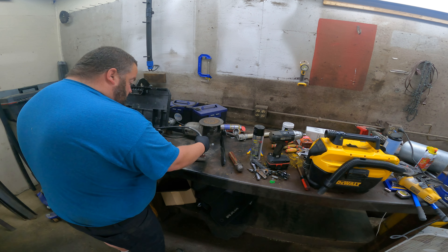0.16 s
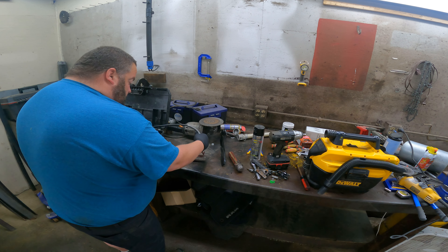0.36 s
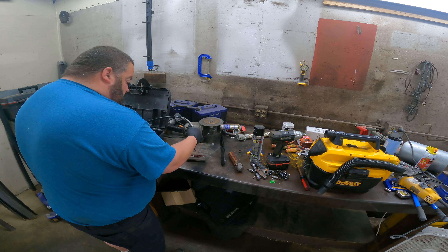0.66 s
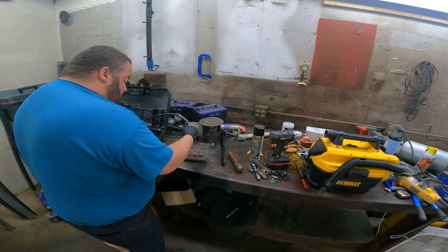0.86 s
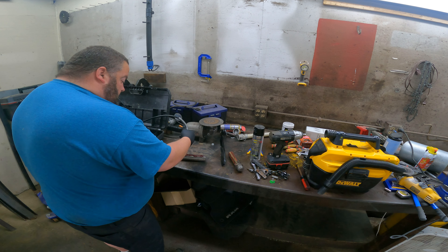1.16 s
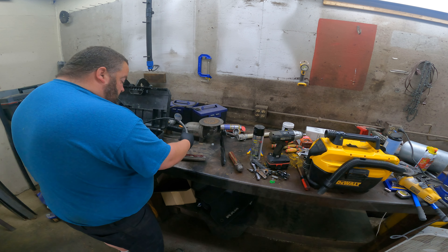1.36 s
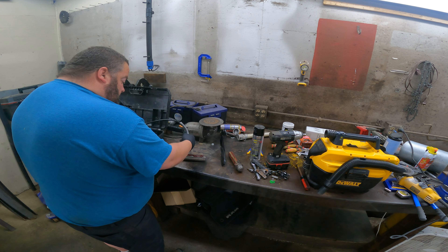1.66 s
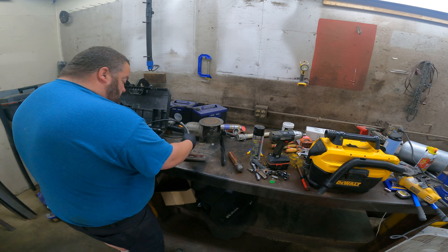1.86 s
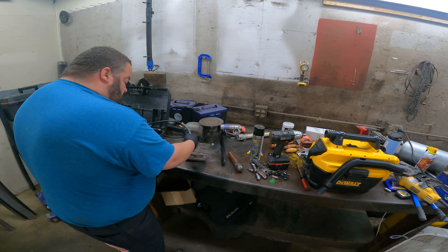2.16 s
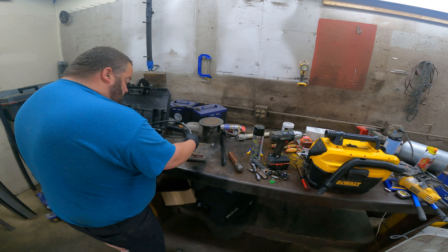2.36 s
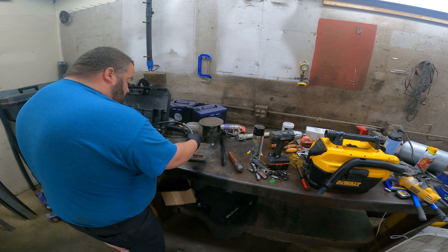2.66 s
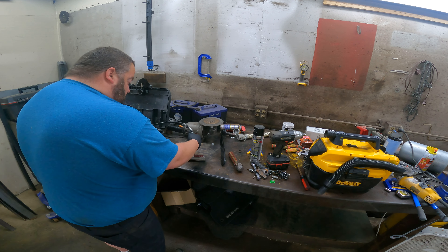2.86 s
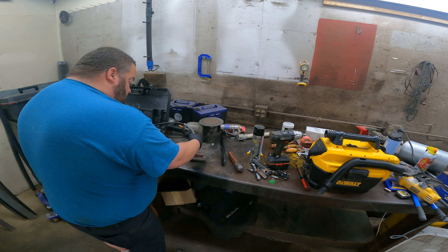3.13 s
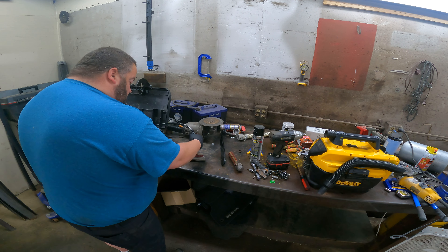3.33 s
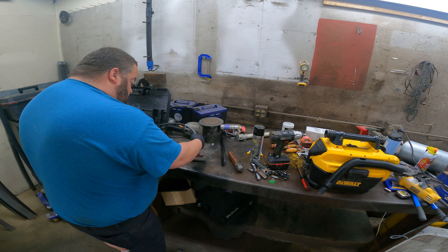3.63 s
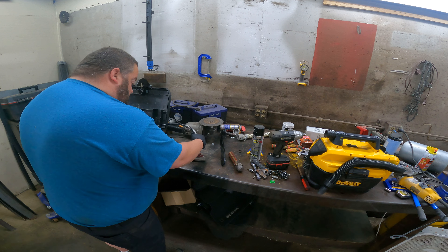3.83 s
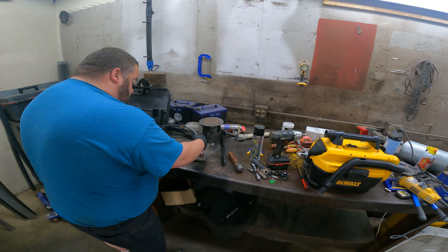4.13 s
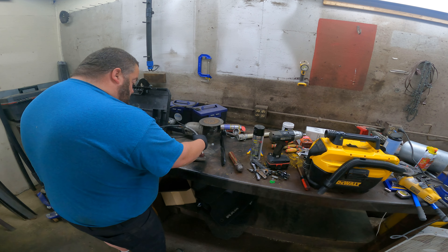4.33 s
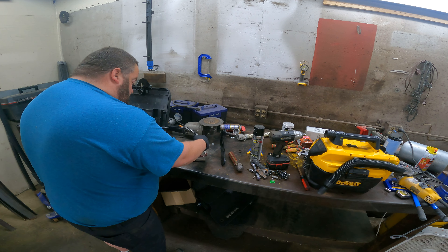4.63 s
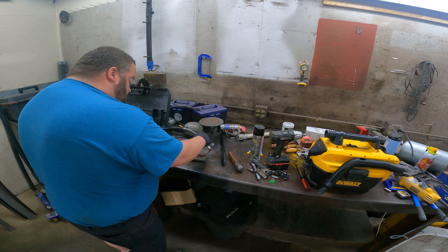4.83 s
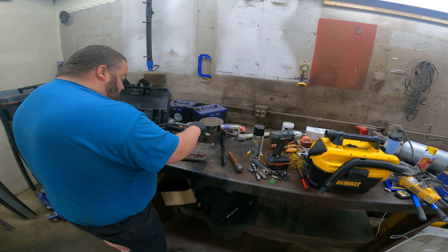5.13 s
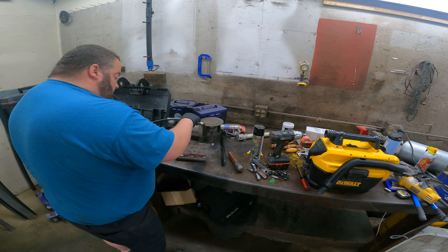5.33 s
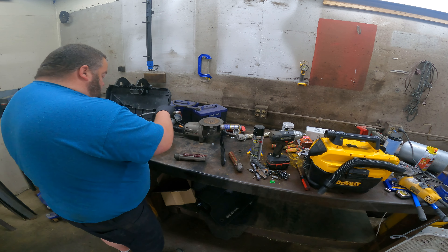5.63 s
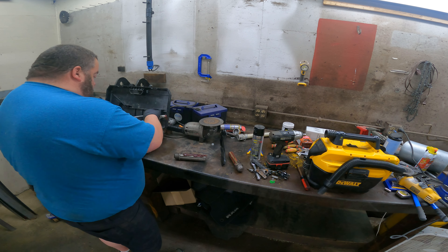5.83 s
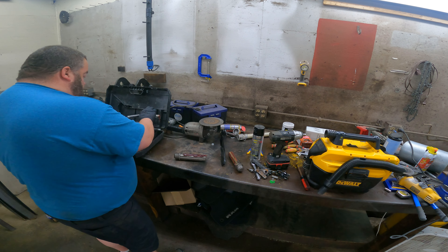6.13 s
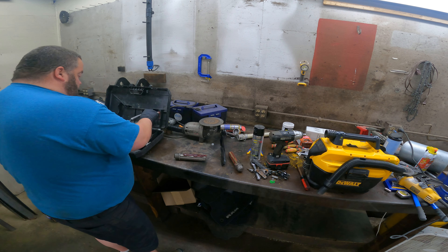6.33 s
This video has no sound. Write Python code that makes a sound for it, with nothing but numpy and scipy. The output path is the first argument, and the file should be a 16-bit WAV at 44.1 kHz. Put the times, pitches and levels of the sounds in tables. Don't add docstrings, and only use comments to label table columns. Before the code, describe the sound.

A battery grease gun is already running, its gritty gear whine dipping with each rattling pump stroke, then stops abruptly. After about a second of room hum, rubbing and small bench taps, it runs again for three seconds at five strokes per second. It brakes with a short burr; a hard microphone bump, handling rustles and a softer bump follow. Hard-walled workshop, stereo microphone fairly near.

```python
import sys
import numpy as np
from scipy import signal
from scipy.fft import rfft, irfft, next_fast_len
from scipy.io import wavfile

SR = 44100
rng = np.random.default_rng(int(sys.argv[2]) if len(sys.argv) > 2 else 0)


def attenuation_scalar(level_db):
    decades = np.asarray(level_db, float) / 20
    return 10 ** decades


def int16_out(signal):
    q = np.round(np.clip(np.atleast_2d(signal).T, -1, 1) * 32767)
    wavfile.write(sys.argv[1], SR, q.astype(np.int16))


N = 286196
LEAD = SR // 2
TIME = np.arange(-LEAD, N) / SR
SIZE = next_fast_len(len(TIME) + SR)
HZ = np.maximum(np.arange(SIZE // 2 + 1) * SR / SIZE, 1)

# (on_s, off_s, free_rotor_hz, gear_level_db)
RUNS = [
    (-.5, 0.388, 360.1, -30.5),
    (1.4335, 4.636, 358.4, -31),
]
# (start_s, rattle_peak_db)
STROKES = [(-.097, -28), (0.092, -22.5), (0.291, -18), (1.584, -16.5), (1.789, -17), (1.989, -18.5),
           (2.186, -18), (2.392, -17), (2.596, -17.5), (2.803, -18.5), (3.008, -19.5), (3.204, -20),
           (3.411, -18), (3.616, -18), (3.812, -18.5), (4.017, -17), (4.231, -20), (4.429, -19.5),
           (4.582, -27)]
# (pitch_hz, width_hz, level_under_gears_db, level_under_rattle_db)
HOUSING = [(425.5, 20.5, 2, -18.5), (664.6, 68.5, 4.5, -2.5), (906.6, 52, -6, 5.5), (992, 93, 4.5, 4),
           (1119, 25, 0.5, 3.5), (1384, 55, 5, -7), (1703, 46, -7, -13), (1974, 16, -33, -11.5),
           (2500, 490, -12.5, -25), (4076, 50, -35, -10.5), (4970, 310, 4, -37), (5830, 210, -4, -16),
           (12080, 690, 6.5, -36.5)]


def rms_one(x):
    return x / np.sqrt(np.mean(x ** 2) + 1e-20)


def at_hz(points, hz=HZ):
    pitches, values = np.array(points)[:, 0], np.array(points)[:, 1]
    return np.interp(np.log(hz), np.log(pitches), values)


def coloured(x, gain):
    return irfft(rfft(x, SIZE) * gain, SIZE)[..., :len(TIME)]


def coloured_noise(spectrum):
    return rms_one(coloured(rng.standard_normal(len(TIME)), attenuation_scalar(at_hz(spectrum))))


def lagged(x, seconds):
    r = np.exp(-1 / (seconds * SR))
    return signal.lfilter([1 - r], [1, -r], x)


def drift(per_s):
    lag_s = 0.14 / per_s
    return rms_one(lagged(lagged(rng.standard_normal(len(TIME)), lag_s), lag_s))


def gate(on, off):
    return ((TIME >= on) & (TIME < off)) * 1.


def click(at, height):
    out = np.full(len(TIME), 1e-18)
    out[round(at * SR) + LEAD] = height
    return out


def resonance(x, hz, width_hz):
    r = np.exp(-np.pi * width_hz / SR)
    feedback = [1, -2 * r * np.cos(2 * np.pi * hz / SR), r * r]
    return signal.lfilter(np.array([1, 0, -1]) * (1 - r * r) / 2, feedback, x)


def diffuse(spectrum, alike):
    mid, side = coloured(rng.standard_normal((2, len(TIME))), attenuation_scalar(at_hz(spectrum)))
    return rms_one(np.sqrt(1 + alike) * mid + np.sqrt(1 - alike) * side * [[1], [-1]])


def workshop(direct, to_walls):
    # (pitch_hz, fade_s)
    fade_times = [(200, 0.9), (1000, 0.68), (4000, 0.85), (8000, 0.52), (14000, 0.71)]
    # (pitch_hz, likeness)
    likeness = [(60, 0.99), (130, 0.85), (290, 0.98), (640, 0.96), (1410, 0.94), (3100, 0.86), (6820, 1),
                (15000, 0.16)]
    # (pitch_hz, difference_db)
    leaning = [(60, 0), (180, -2), (550, 0.5), (1650, 2), (4970, 1), (15000, 3.5)]
    room_db = -5
    spread = 1.44

    t, tail = np.arange(SR) / SR, 0
    for low in 60 * 2. ** np.arange(8):
        octave = signal.butter(2, [low, 2 * low], "band", fs=SR, output="sos")
        band = signal.sosfilt(octave, rng.standard_normal((2, SR)))
        dying = attenuation_scalar(-60 * t / at_hz(fade_times, 1.33 * low))
        tail = tail + band * dying * np.clip(t / 0.018, 0, 1)
    mid, side = attenuation_scalar(room_db) * rfft(tail / np.sqrt(np.sum(tail[0] ** 2)), SIZE)
    apart = np.sqrt(1 - np.clip(at_hz(likeness), 0, 1))
    lean = attenuation_scalar(at_hz(leaning) / 2)
    lean = np.array([lean, 1 / lean])
    echo = lean * (mid + spread * apart * side * [[1], [-1]])
    return coloured(direct, lean) + coloured(to_walls, echo)


def room_hum():
    # (pitch_hz, level_per_hz_db)
    hum_colour = [(12, -34), (20, -9.5), (64, -4.5), (85, -19.5), (196, -7.5), (252, -17.5), (306, -15),
                  (333, -19), (362, -11), (519, -10.5), (686, -21), (985, -11), (1410, -15.5),
                  (6020, -27.5), (15500, -57.5)]
    return attenuation_scalar(-55) * diffuse(hum_colour, alike=0.74)


def swell(s, seconds):
    rise_s = 0.2 * seconds
    return np.sin(np.pi / 2 * np.interp(TIME, [s, s + rise_s, s + seconds], [0, 1, 0])) ** 2


def handling():
    # (start_s, length_s, thud_db, rub_db, rustle_db)
    moves = [
        (0.697, 0.36, -67, -57, -63),
        (0.955, .2, -57, -64, -61.5),
        (1.353, 0.22, -61, -64, -60.5),
        (4.902, 0.29, -60.5, -63, -61.5),
        (5.307, 0.46, -61.5, -54.5, -60.5),
        (5.5, 0.38, -62.5, -65, -69),
        (5.872, 0.46, -61, -76, -63.5),
        (6.07, 0.42, -64, -72, -59.5),
        (6.264, 0.46, -59.5, -68, -54),
        (6.31, .09, -64, -76, -56.5),
    ]
    # (pitch_hz, level_per_hz_db)
    thud_colour = [(110, -22), (180, 7.5), (290, 8), (450, 1), (600, -37)]
    rub_colour = [(450, -19), (700, 4.5), (760, -3), (850, -5), (1200, -9), (1600, -39.5)]
    rustle_colour = [(590, -41), (1000, -2), (1570, 3), (2020, -1.5), (3810, -2), (5730, -3),
                     (12100, -23.5), (14000, -36), (15000, -72)]

    efforts = sum(attenuation_scalar(np.array(levels_db))[:, None] * swell(s, seconds) for s, seconds, *levels_db in moves)
    thud, rub, rustle = efforts
    thud = thud * attenuation_scalar(2.3 * drift(19)) * diffuse(thud_colour, alike=0.95)
    rub = rub * attenuation_scalar(1.0 * drift(30)) * diffuse(rub_colour, alike=0.75)
    rustle = rustle * attenuation_scalar(1.8 * drift(90)) * diffuse(rustle_colour, alike=0.87)
    return thud + rub + rustle


def bumps():
    # (start_s, push_db, tick_db, rebound_tick_db, wobble_hz)
    knocks = [
        (4.8394, -24, -11, -21, 233),
        (5.5436, -28.5, -19.5, -45, 190),
    ]
    sway_hz, sway_s, sway_db = 34, .012, -1
    pan_db = -7
    bass_cut = signal.butter(2, 16, "high", fs=SR, output="sos")
    treble_cut = signal.butter(3, 7000, fs=SR, output="sos")

    out = 0
    for s, push_db, tick_db, rebound_db, wobble_hz in knocks:
        push = -attenuation_scalar(push_db) * np.sin(np.pi * np.clip((TIME - s) / 0.0056, 0, 1)) ** 2
        recoil = signal.sosfilt(bass_cut, push)
        since = np.maximum(TIME - s - .0065, 0)
        sway = attenuation_scalar(push_db + sway_db) * np.sin(2 * np.pi * sway_hz * since) * np.exp(-since / sway_s)
        wobble = resonance(click(s + .0004, attenuation_scalar(push_db + 45)), wobble_hz, 110)
        wobble = lagged(lagged(wobble, .0003), .0002)
        ticks = click(s, -attenuation_scalar(tick_db)) + click(s + .0041, -attenuation_scalar(rebound_db))
        dull = lagged(lagged(ticks, 0.0002), .00006) * 8
        bright = resonance(resonance(ticks, 3300, 2400), 4100, 2400) * 1.6
        ticks = signal.sosfilt(treble_cut, dull + bright)
        out = out + (recoil + sway + wobble + ticks) * attenuation_scalar(np.array([[pan_db / 2], [-pan_db / 2]]))
    return out


def taps():
    # (start_s, peak_db, ring_hz)
    touches = [
        (0.742, -37.5, 550),
        (0.977, -38.5, 1130),
        (0.986, -37, 1040),
        (0.995, -39, 1010),
        (1.005, -43, 1040),
        (6.253, -51, 1300),
        (6.391, -50, 1300),
    ]
    body = ((1, 0), (1.4, -7), (2.0, -13.5))   # (multiple of the ring, level_db)
    rings = 0
    for s, db, hz in touches:
        for k, part_db in body:
            hit = click(s, attenuation_scalar(db + part_db + 37))
            rings = rings + resonance(resonance(hit, k * hz, 220), k * hz, 220)
    return rings + resonance(click(touches[2][0], attenuation_scalar(-36)), 6000, 6000)


def shake(s, seconds, sag_db):
    return gate(s, s + seconds) * attenuation_scalar(-sag_db * np.clip(TIME - s, 0, seconds) / seconds)


def brake():
    # (start_s, level_db)
    jolts = [
        (.355, -26.5),
        (1.4333, -32),
        (4.59, -28),
    ]
    burr = coloured_noise([(1200, -33), (2700, 3.5), (5000, 4), (8000, -11.5), (12000, -37)])
    return burr * lagged(sum(attenuation_scalar(db) * shake(s, 0.046, sag_db=15.0) for s, db in jolts), 0.002)


def rattle():
    # (pitch_hz, level_per_hz_db)
    grind_colour = [(1200, -25), (2000, 1.5), (3200, -2), (5000, 4.5), (6200, 2), (7500, -5.5), (9500, -13),
                    (13000, -36)]
    knocks = rng.standard_normal(len(TIME)) * attenuation_scalar(2.0 * drift(60))
    rings = 0
    for k, (hz, width, _, db) in enumerate(HOUSING):
        rings = rings + attenuation_scalar(db) * (-1) ** k * resonance(knocks, hz, width)
    effort = sum(attenuation_scalar(db - 7) * shake(s, .065, sag_db=7.5) for s, db in STROKES)
    start = attenuation_scalar(-32) * shake(RUNS[1][0], 0.136, sag_db=5)
    grind = attenuation_scalar(-6.5) * coloured_noise(grind_colour) * lagged(effort, .01)
    return rms_one(rings) * lagged(effort + start, .003) + grind


def rotor_hz():
    motor_lag_s, drag_hz = .04, 45.9
    pressure_s, pressure_delay_s = .055, 0.0027
    let_go_s, let_go_hz = .082, 20

    free = 0
    for on, off, hz, _ in RUNS:
        free = free + hz * gate(on + .007, off + .1) - let_go_hz * gate(off - let_go_s, off + .1)
    drag = 0
    for s, _ in STROKES:
        drag = drag + drag_hz * np.sin(np.pi * np.clip((TIME - s - pressure_delay_s) / pressure_s, 0, 1))
    return lagged(free - drag, motor_lag_s)


def whine(speed):
    # (multiple of rotor speed, level_db, loss_db per Hz of slowing)
    overtones = [(5, -51, .3), (12, -34.5, .37), (15, -42, .5), (20, -46, .2), (25, -53.5, .1),
                 (30, -64.5, .1)]
    # (time_s, level_db)
    imbalance = [(0, -47.5), (1.5, -42), (1.9, -40), (2.7, -41.5), (3.1, -46), (3.9, -46), (4.6, -45)]
    handle_hz, handle_width_hz = 349, 9

    turn = 2 * np.pi * np.cumsum(speed + 0.277 * drift(39.0)) / SR
    slowing = np.clip(358 - speed, 0, 14)
    tones = sum(attenuation_scalar(db - loss * slowing + 1.7 * drift(30)) * np.sin(k * turn) for k, db, loss in overtones)
    shaking = attenuation_scalar(np.interp(TIME, *np.transpose(imbalance)))
    hum = shaking * resonance(np.sin(turn), handle_hz, handle_width_hz)
    return np.sqrt(2) * (tones * np.clip(speed / 290, 0, 1) ** 6 + hum)


def gears(speed):
    # (pitch_hz, level_per_hz_db)
    tooth_colour = [(71, -52), (120, -25), (346, -10), (498, -13.5), (975, -4), (1220, -7), (1410, -9.5),
                    (1590, -7), (3110, -10), (4220, -6), (4570, -13), (5490, -12.5), (7300, -14.5),
                    (12100, -35), (15500, -54)]
    turn = 2 * np.pi * np.cumsum(speed) / SR
    unevenness = attenuation_scalar(1.0 * drift(23) + 1.2 * drift(106))
    teeth = rng.standard_normal(len(TIME)) * (1 + 0.16 * np.cos(turn)) * unevenness
    teeth = coloured(teeth, attenuation_scalar(at_hz(tooth_colour)))
    teeth = teeth + sum(attenuation_scalar(db) * resonance(teeth, hz, width) for hz, width, db, _ in HOUSING)
    hiss = coloured(teeth, 1 / (1 + (7000 / HZ) ** 8))
    spinning_up = np.clip(1 - speed / 335, 0, 1) * gate(RUNS[1][0] - .1, RUNS[1][1])
    return rms_one(teeth - hiss * spinning_up ** .3)


def grease_gun():
    # (pitch_hz, level_per_hz_db)
    rumble_colour = [(20, -6), (40, -12), (70, 8), (110, -8.5), (200, -19)]
    speed = rotor_hz()
    running = sum(gate(on, off - .05) for on, off, _, _ in RUNS)
    driven = sum(attenuation_scalar(db) * gate(on, off) for on, off, _, db in RUNS)
    driven = driven * (0.4 + 0.62 * np.clip(speed / 350, 0, 1))
    effort = np.maximum(lagged(driven, 0.0011), lagged(driven, 0.012))
    rumble = running * attenuation_scalar(-61.5) * coloured_noise(rumble_colour)
    noise = rumble + effort * gears(speed) + rattle() + brake()
    return np.array([lagged(running, 0.018) * whine(speed), noise])


def scene():
    beamed, spread = grease_gun()
    spread = spread + taps()
    in_room = workshop(beamed + spread, attenuation_scalar(-1.0) * beamed + spread)
    return (in_room + room_hum() + handling() + bumps())[:, LEAD:]


def low_pass(x):
    return signal.sosfilt(signal.butter(12, 15740, fs=SR, output="sos"), x)


def record(dry):
    return low_pass(dry)


dry = scene()
out = record(dry)
int16_out(out)
```